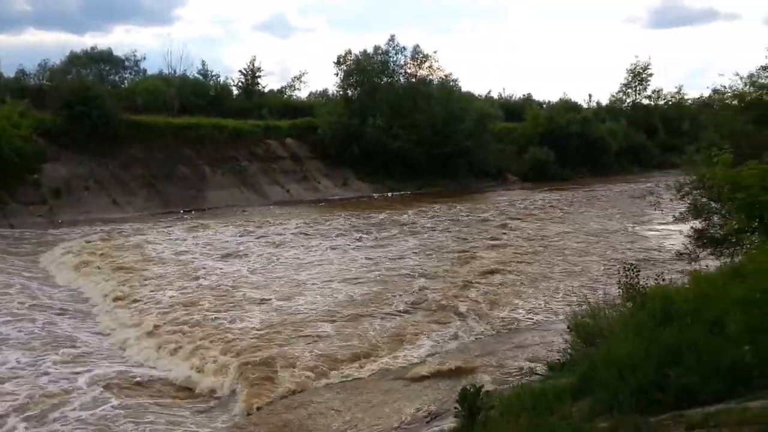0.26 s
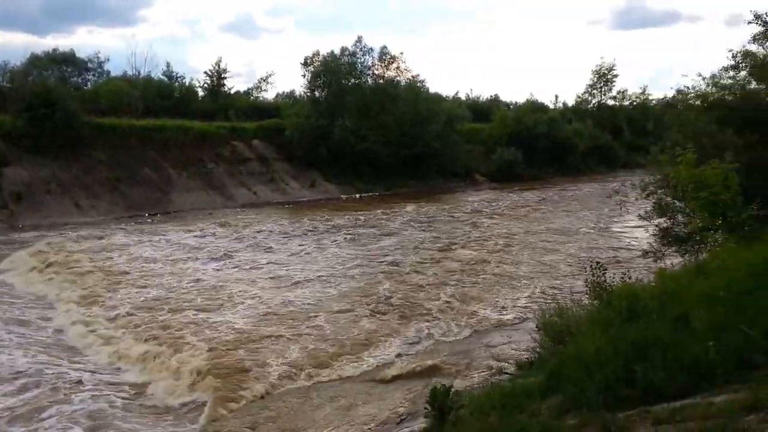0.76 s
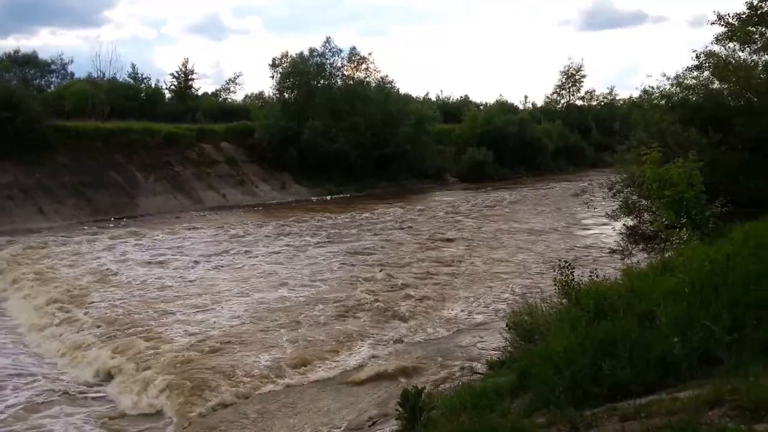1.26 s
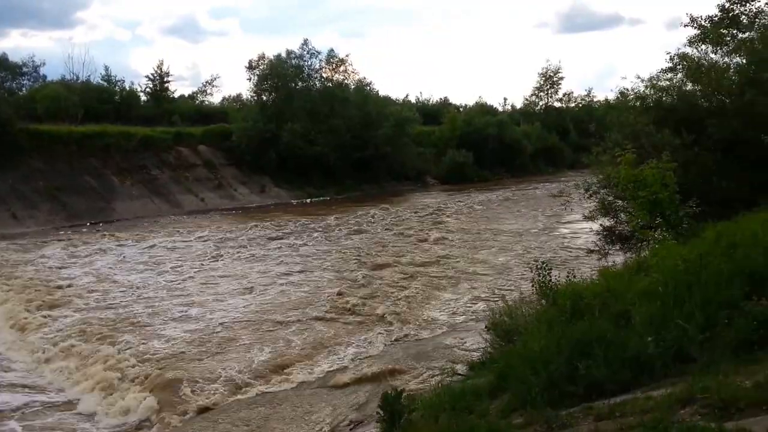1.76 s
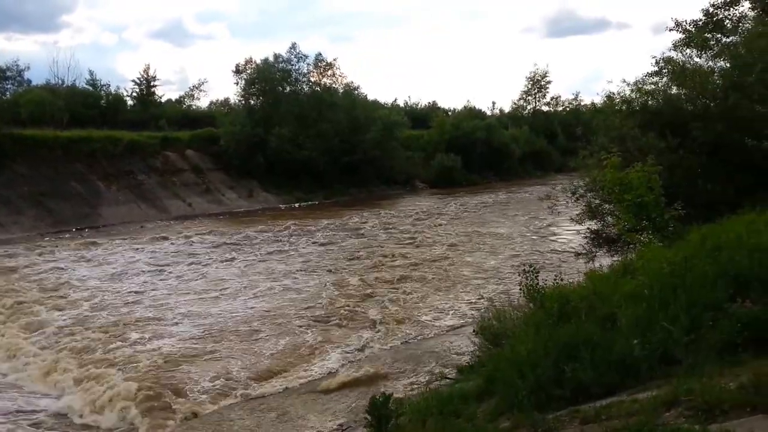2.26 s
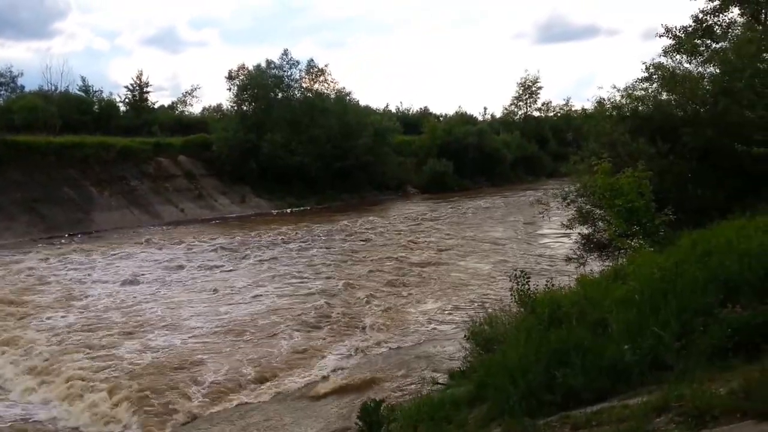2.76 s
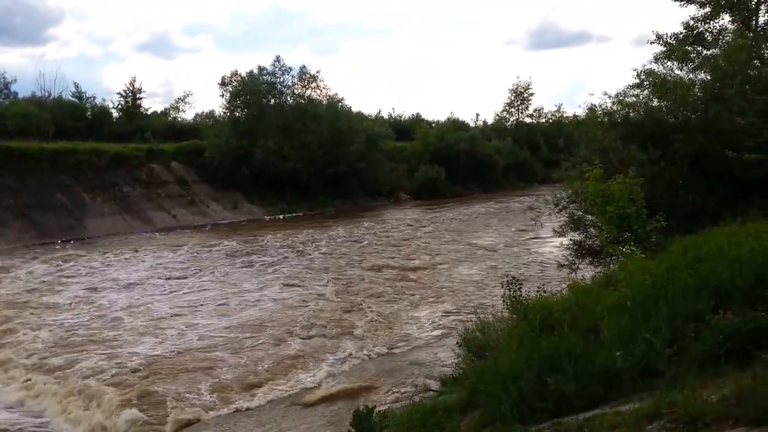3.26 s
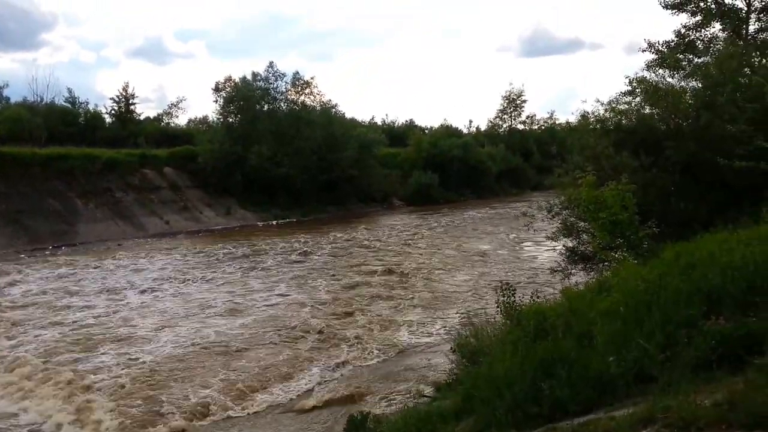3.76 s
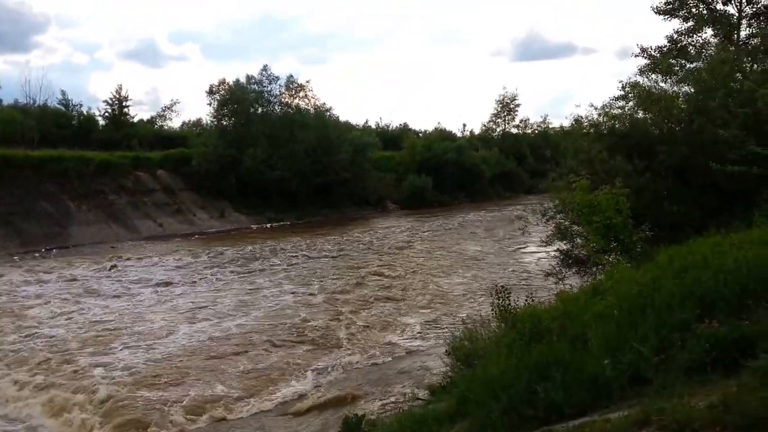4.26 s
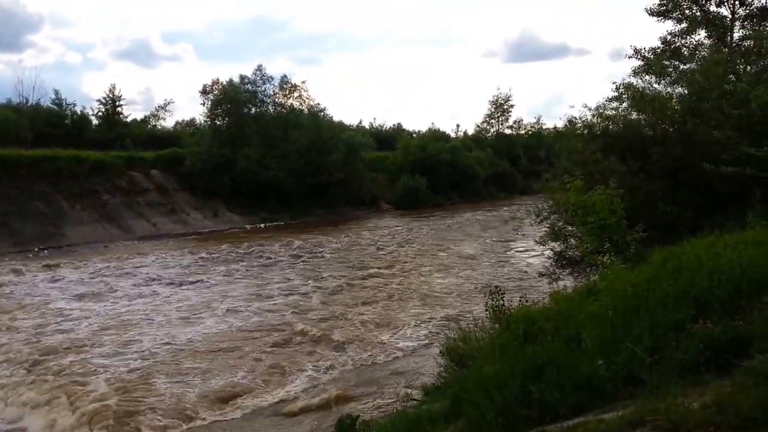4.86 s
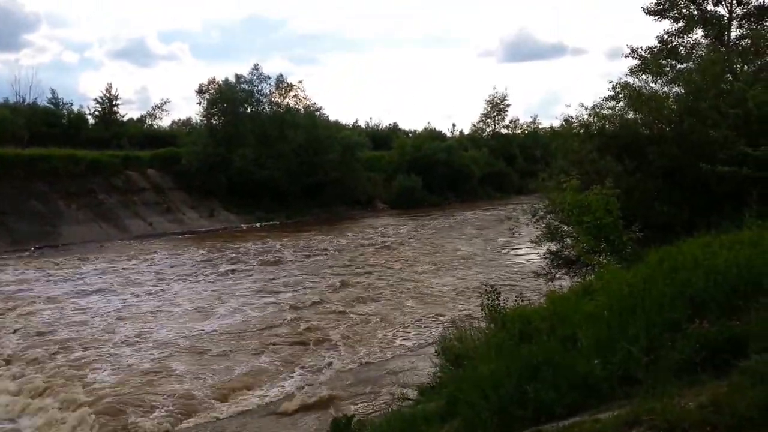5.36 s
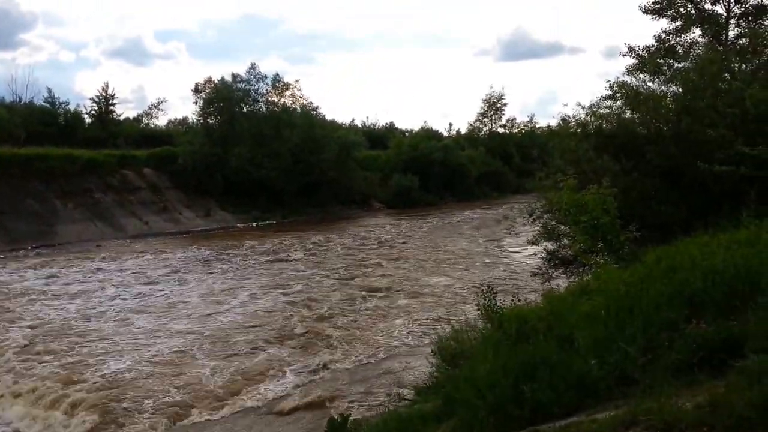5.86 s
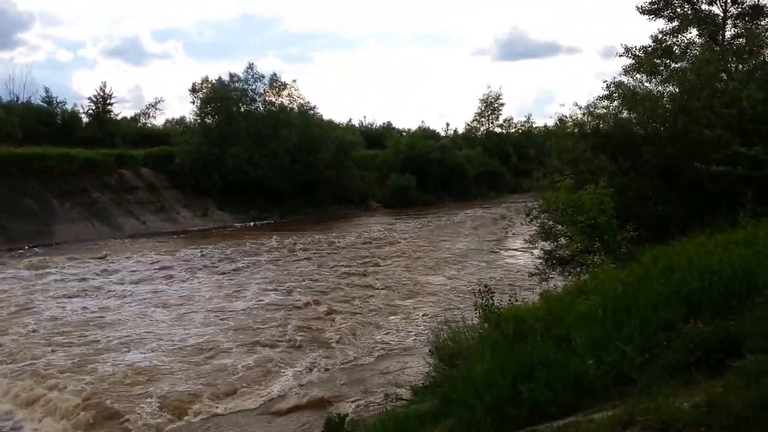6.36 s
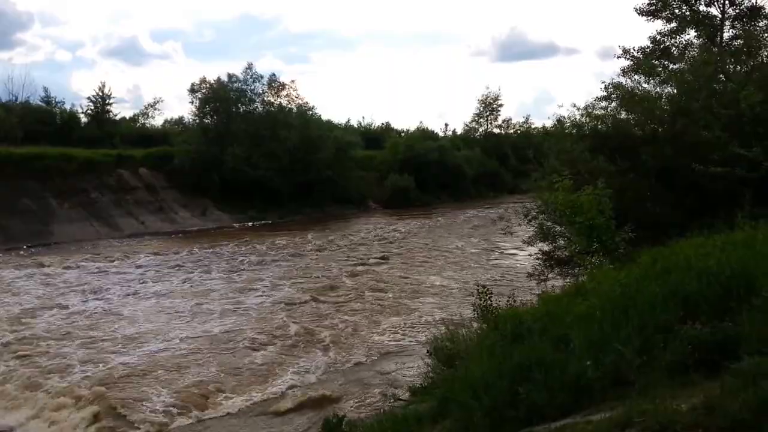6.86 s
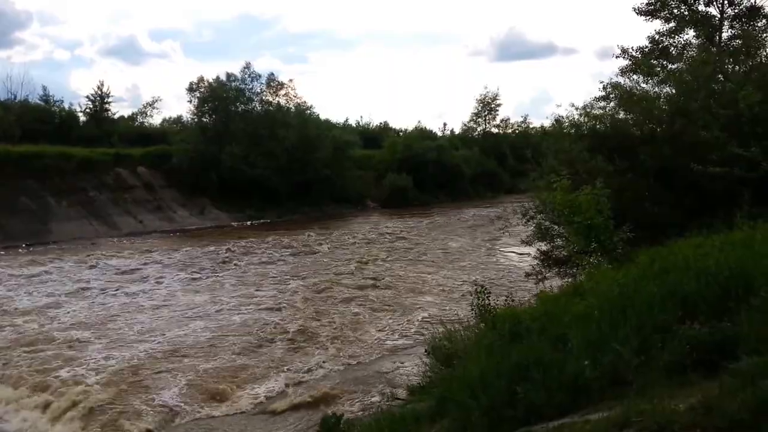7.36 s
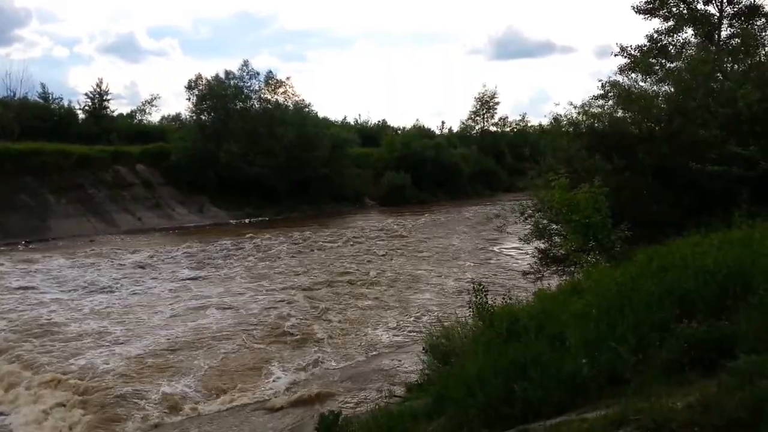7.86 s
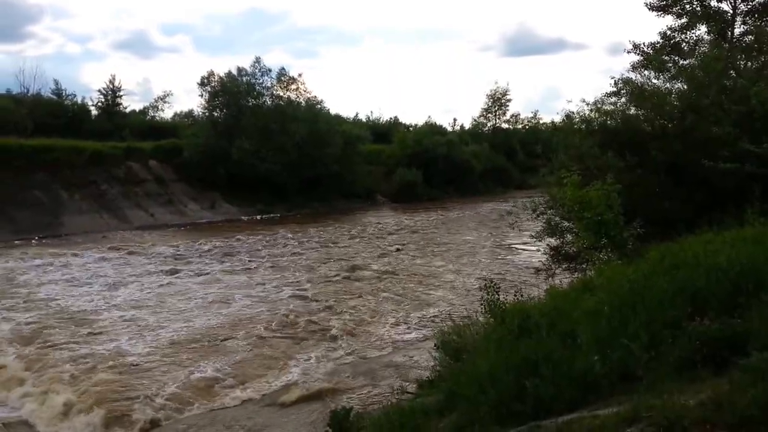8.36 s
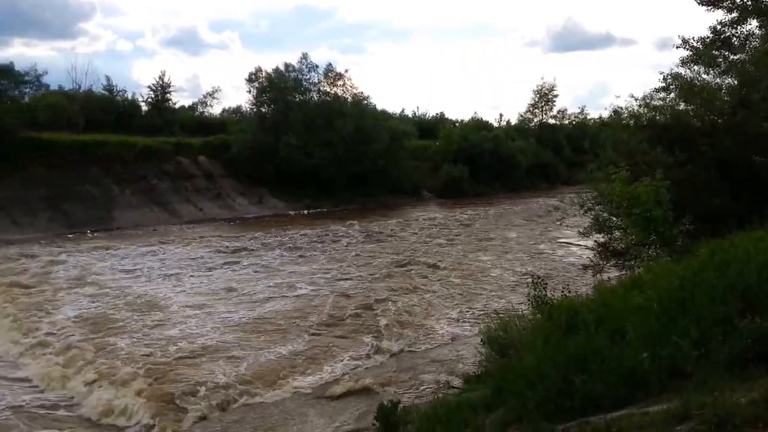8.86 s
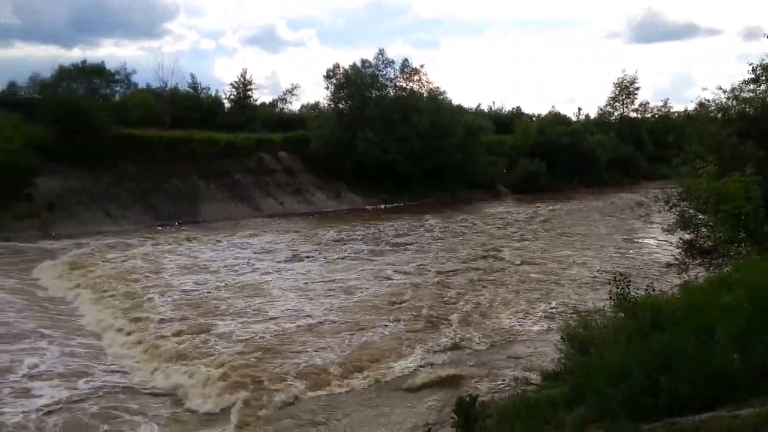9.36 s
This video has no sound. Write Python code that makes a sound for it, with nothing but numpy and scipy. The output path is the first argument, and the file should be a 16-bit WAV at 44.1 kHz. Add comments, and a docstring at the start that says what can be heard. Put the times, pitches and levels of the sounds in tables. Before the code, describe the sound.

Heard outdoors from the bank, a swollen river rushes continuously over a weir. A broad hiss of foam lies on top of a bubbling, hollow roar and a soft rumble with gulping pockets of air. These sounds swell gently together as crests collapse several times a second, but the overall level holds throughout, spread widely across a stereo microphone.

```python
"""Rushing foam of muddy floodwater pouring over a low weir, heard in the open from the bank.
Breaking crests hiss and countless small bubbles fizz. Below the sill a roller folds in air:
mid-size bubbles ring as splashes, large pockets gulp. All surge as waves topple a few times
a second. The sound reaches two small microphone ports; left and right differ in colour."""
import sys
import numpy as np
from scipy import signal
from scipy.fft import rfft, irfft, next_fast_len
from scipy.io import wavfile
from scipy.ndimage import uniform_filter1d

SR = 44100
rng = np.random.default_rng(int(sys.argv[2]) if len(sys.argv) > 2 else 0)


def dump(signal):
    """Clip the signal to [-1, 1] and save it as 16-bit WAV at the path in sys.argv[1]."""
    limited = np.clip(np.atleast_2d(signal).T, -1, 1)
    pcm = np.round(limited * 32767).astype(np.int16)
    wavfile.write(sys.argv[1], SR, pcm)


N = 423338
FFT_SIZE = next_fast_len(N)
BIN_HZ = np.maximum(np.arange(FFT_SIZE // 2 + 1) * SR / FFT_SIZE, 1)
TIME_S = np.arange(N) / SR

FOAM_DB, SPLASH_DB, GULP_DB = -20.5, -26.5, -28.5  # between waves, ahead of the ports
TOPPLE_S, SPILL_POWER = 0.058, 5.1  # higher power holds a wave longer
ROLL_S = 0.024  # wave travel along the roller's width
FLICKER_S, POCKET_S = 0.022, 0.025
RIGHT_LEAD_S, CUTOFF_HZ = 0.000319, 14000

# Foam spectrum: freq_hz, level_db
FOAM_SPECTRUM = [(100, -55), (450, -16), (850, -2.26), (1250, 0.47), (1800, 0), (2600, -4.5), (3200, -7.5),
                 (4600, -8), (6100, -19.5), (9700, -20.5), (12000, -25.5), (13000, -35.5), (14000, -53)]
# Splash spectrum: freq_hz, level_db
SPLASH_SPECTRUM = [(200, -42), (400, -8), (560, -1.3), (700, -1), (800, -6), (950, -11.5), (1300, -18.5),
                   (6000, -76)]
# Gulp spectrum: freq_hz, level_db
GULP_SPECTRUM = [(20, -35), (48, -33), (62, -29), (75, -24), (158, -5.0), (290, 0.2), (400, -6.5),
                 (600, -16), (2000, -62)]
# Toppling waves: start_s, length_s, foam_rise_db, splash_rise_db, gulp_rise_db
WAVES = [(-0.03, 0.19, 2.7, 3.5, 3.0), (0.12, 0.44, 2.4, 3.0, 2.4), (0.51, 0.21, 2.5, 4.0, 2.6),
         (0.73, 0.35, 2.3, 3.1, 2.6), (1.01, 0.26, 2.3, 3.2, 3.6), (1.22, 0.4, 2.7, 3.5, 3.5),
         (1.55, 0.17, 2.3, 3.1, 2.9), (1.73, 0.3, 2.1, 2.3, 4.0), (1.98, 0.27, 2.1, 3.0, 1.7),
         (2.21, 0.29, 2.6, 4.1, 3.5), (2.42, 0.23, 2.9, 3.3, 3.0), (2.61, 0.2, 2.5, 2.6, 1.2),
         (2.79, 0.23, 2.7, 3.5, 2.0), (3.1, 0.28, 1.9, 2.9, 2.9), (3.34, 0.15, 3.2, 3.5, 4.7),
         (3.55, 0.21, 2.4, 3.1, 2.5), (3.7, 0.31, 2.7, 3.0, 3.6), (4.01, 0.35, 2.4, 3.0, 3.1),
         (4.36, 0.17, 3.1, 3.7, 4.6), (4.51, 0.22, 2.6, 2.9, 3.8), (4.73, 0.24, 3.0, 4.2, 3.8),
         (4.91, 0.33, 2.1, 2.9, 3.6), (5.18, 0.15, 2.5, 1.6, 3.3), (5.35, 0.17, 2.7, 3.0, 1.2),
         (5.52, 0.35, 2.4, 2.7, 2.1), (5.82, 0.3, 2.4, 3.4, 3.3), (6.1, 0.45, 2.6, 2.9, 3.2),
         (6.52, 0.26, 2.3, 2.9, 3.3), (6.7, 0.18, 2.6, 2.6, 3.2), (6.84, 0.39, 2.5, 2.9, 4.2),
         (7.16, 0.23, 3.0, 3.7, 2.2), (7.34, 0.46, 3.0, 3.9, 3.2), (7.75, 0.19, 2.5, 2.8, 2.7),
         (7.92, 0.19, 2.7, 3.5, 4.1), (8.13, 0.36, 2.1, 2.9, 3.8), (8.45, 0.24, 2.6, 3.2, 2.3),
         (8.72, 0.15, 0.9, 2.0, 1.2), (8.82, 0.23, 2.8, 3.3, 3.6), (8.97, 0.18, 2.3, 2.7, 2.8),
         (9.07, 0.37, 2.1, 2.8, 2.4), (9.43, 0.39, 2.8, 2.6, 3.6)]
# Slow rise and slack of the flow over the sill: time_s, level_db
FLOW = [(0, 0.4), (0.6, 0), (2.9, -0.1), (3.07, -0.7), (3.25, -0.07), (6.8, 0), (7.4, -0.1), (8.7, 0),
        (9.6, 0.1)]
# Brief lifts and dips in splash and foam loudness: time_s, splash_db, foam_db
SPLASH_FOAM_FLICKERS = [(0.1, 2.5, 1), (0.59, 1, 1.3), (1.36, 3, 0), (1.62, -1, 2), (2.02, 2, -0.5),
                        (2.28, 4.5, 0.4), (3.39, 2, 0.6), (3.85, 2, 2), (4.15, 0, -1), (4.44, 3, 0.6),
                        (4.59, 1.2, 1.5), (4.82, 1.5, 0.7), (5.12, 4, 1), (5.41, 1.2, 0.3), (5.96, 2, 0.7),
                        (6.2, 3, 1.2), (6.43, -1.5, 2), (6.75, 0, 0.7), (7.0, 2, -0.2), (7.22, 2, -0.5),
                        (7.51, 0.8, 1.0), (9.02, 1.5, 0.1), (9.1, -2, 0.5)]
# Big air pockets swallowed by the roller: time_s, gulp_rise_db
POCKETS = [(1.08, 3), (1.82, 1.2), (2.31, 3), (2.55, 3), (3.2, 3), (3.43, 1.5), (3.77, 2), (4.12, 1),
           (4.44, 0), (4.8, 1.8), (6.93, 2), (8.35, 2.5), (8.89, 3)]
# Left-over-right level, left treble cut above 12 kHz: freq_hz, balance_db
CHANNEL_BALANCE = [(100, -2), (250, -1), (370, 0), (560, -3.5), (800, 2), (1100, 3), (1280, 2.5),
                   (2000, 8.5), (3300, -1.5), (4400, -1.7), (6400, -5), (9800, -1.3), (12000, -3.5),
                   (13200, -19)]
# Sound shared by the ports: freq_hz, coherence_ratio
PORT_COHERENCE = [(40, .15), (90, 0.97), (150, 0.99), (300, 0.99), (400, 0.87), (550, 0.94), (730, 0.88),
                  (1050, 0.72), (1650, 0.54), (2050, 0.46), (2550, 0.7), (3300, 0.1), (5500, 0.06),
                  (7500, 0.2), (13000, 0.04)]
# Right port phase on top of its lead: freq_hz, phase_rad
PORT_PHASE = [(100, -0.64), (400, -0.34), (700, -0.91), (1250, -0.86), (1800, 0.012), (2350, 0.83),
              (3300, 1.98), (6300, -1.23), (10000, 0.17)]


def foam(surge_db):
    """Breaking crests hiss; the nearest small bubbles and droplets fizz on top."""
    fizz = bubbles(low_hz=812, high_hz=11560, per_s=12000, cycles=7.7, spread_db=2, clump_db=1, sizes=14)
    hiss = crest_hiss(depth_db=0.5, rate_hz=22, bands=6)
    water = coloured(hiss + from_db(-8.5) * fizz, FOAM_SPECTRUM)
    return water * swell(depth_db=0.44, rate_hz=29) * from_db(FOAM_DB + surge_db)


def crest_hiss(depth_db, rate_hz, bands):
    """Crests break here and there: white noise, each band swelling on its own; rms 1."""
    white = rfft(rng.standard_normal((2, FFT_SIZE)))
    band_position = np.interp(np.log(BIN_HZ), np.log([700, 11000]), [0, bands - 1])
    hiss = np.zeros((2, N))
    for band in range(bands):
        weight = np.maximum(1 - np.abs(band_position - band), 0)
        hiss += irfft(white * weight, FFT_SIZE)[:, :N] * swell(depth_db, rate_hz)
    return rms_one(hiss)


def splashes(surge_db):
    """Toppling crests drag mid-size bubbles under, which ring together as a hollow roar."""
    near = bubbles(low_hz=430, high_hz=1095, per_s=1800, cycles=28, spread_db=2, clump_db=1, sizes=12)
    roar = coloured(rng.standard_normal((2, N)), SPLASH_SPECTRUM)
    water = levelled(roar + from_db(-3.5) * coloured(near, SPLASH_SPECTRUM), window_s=0.24)
    return water * swell(depth_db=0.66, rate_hz=11.4) * from_db(SPLASH_DB + surge_db)


def gulps(surge_db):
    """Large near air pockets gulp over the rumble of the whole roller."""
    near = bubbles(low_hz=129, high_hz=424, per_s=900, cycles=19, spread_db=2, clump_db=0.5, sizes=10)
    rumble = coloured(rng.standard_normal((2, N)), GULP_SPECTRUM)
    water = levelled(rumble + from_db(-5) * coloured(near, GULP_SPECTRUM), window_s=0.13)
    return water * swell(depth_db=0.47, rate_hz=23) * from_db(GULP_DB + surge_db)


def bubbles(low_hz, high_hz, per_s, cycles, spread_db, clump_db, sizes):
    """Two independent swarms, born at random, each bubble ringing down 60 dB in `cycles`; rms 1."""
    chance = rng.random((2, N))
    size_index = rng.integers(0, sizes, (2, N), dtype=np.int8)
    strength = from_db(spread_db * np.minimum(rng.exponential(1, (2, N)), 4))
    polarity = rng.choice([-1, 1], (2, N))
    births = strength * polarity * (chance < per_s / SR)
    swarms = np.zeros((2, N))
    for size, pitch_hz in enumerate(np.geomspace(low_hz, min(high_hz, CUTOFF_HZ), sizes)):
        radius = from_db(-60 * pitch_hz / (cycles * SR))
        step_rad = 2 * np.pi * pitch_hz / SR
        feedback = [1, -2 * radius * np.cos(step_rad), radius * radius]
        rings = signal.lfilter([1 - radius, 0, radius - 1], feedback, births * (size_index == size))
        swarms += rings * swell(clump_db, rate_hz=7.4)  # each size comes in clouds
    return rms_one(swarms)


def wave_surges_db():
    """Waves topple, spill and collapse on the slow flow; one curve each for foam, splashes, gulps."""
    waves_db = np.zeros((3, N))
    for start_s, length_s, *rises_db in WAVES:
        during = (TIME_S >= start_s) & (TIME_S < start_s + length_s)
        age_s = TIME_S[during] - start_s
        topple = np.sin(np.pi / 2 * np.minimum(age_s / TOPPLE_S, 1))
        spill = 1 - (age_s / length_s) ** SPILL_POWER
        waves_db[:, during] += np.outer(rises_db, topple * spill)
    flow_db = np.interp(TIME_S, *np.transpose(FLOW))
    return uniform_filter1d(waves_db, int(ROLL_S * SR)) + flow_db


def bursts_db(events, width_s):
    """Brief bell-shaped lifts or dips; one curve per level column."""
    return sum(np.outer(rises_db, 1 / (1 + ((TIME_S - peak_s) / width_s) ** 2) ** 2)
               for peak_s, *rises_db in events)


def swell(depth_db, rate_hz):
    """Randomly wandering gain: depth_db rms, low-passed at rate_hz."""
    hop, warmup = 100, 500
    pole = np.exp(-2 * np.pi * hop * rate_hz / SR)
    noise = rng.standard_normal(N // hop + warmup + 2)
    drift = signal.lfilter([1], [1, -2 * pole, pole * pole], noise)[warmup:]
    return np.interp(np.arange(N) / hop, np.arange(len(drift)), from_db(depth_db * rms_one(drift)))


def levelled(sound, window_s):
    """Many bubbles at once sum to an even level over window_s; rms 1."""
    window = int(window_s * SR)
    power = uniform_filter1d(uniform_filter1d(sound ** 2, window), window)
    return rms_one(sound / np.sqrt(power + 1e-9))


def ports(water):
    """The wide river reaches both ports alike in the bass, mostly unalike in the treble."""
    shared, apart = rfft(water, FFT_SIZE)
    coherence = at_hz(PORT_COHERENCE)
    mid = np.sqrt((1 + coherence) / 2) * shared
    side = np.sqrt((1 - coherence) / 2) * apart
    lean = from_db(at_hz(CHANNEL_BALANCE) / 2)
    lead_rad = 2 * np.pi * BIN_HZ * RIGHT_LEAD_S + at_hz(PORT_PHASE)
    left = (mid + side) * lean
    right = (mid - side) * np.exp(1j * lead_rad) / lean
    return irfft(np.array([left, right]), FFT_SIZE)[:, :N]


def coloured(sound, spectrum):
    """Apply a spectrum table; rms 1."""
    shaped = rfft(sound, FFT_SIZE) * from_db(at_hz(spectrum))
    return rms_one(irfft(shaped, FFT_SIZE)[..., :N])


def at_hz(table):
    """Table value at each FFT bin, on a log-frequency axis."""
    freq_hz, values = np.transpose(table)
    return np.interp(np.log(BIN_HZ), np.log(freq_hz), values)


def from_db(level_db):
    """Decibels to gain."""
    return 10 ** (np.asarray(level_db) / 20)


def rms_one(sound):
    """Scale to rms 1."""
    return sound / np.sqrt(np.mean(sound ** 2) + 1e-20)


def scene():
    """The weir at the two ports; the same waves drive all three layers."""
    foam_db, splash_db, gulp_db = wave_surges_db()
    splash_flicker_db, foam_flicker_db = bursts_db(SPLASH_FOAM_FLICKERS, FLICKER_S)
    pocket_db, = bursts_db(POCKETS, POCKET_S)
    water = foam(foam_db + foam_flicker_db)
    water += splashes(splash_db + splash_flicker_db)
    water += gulps(gulp_db + pocket_db)
    return ports(water)


def record(dry):
    """Steep low-pass at CUTOFF_HZ."""
    return signal.sosfilt(signal.ellip(10, 0.1, 90, CUTOFF_HZ, fs=SR, output="sos"), dry)


dry = scene()
out = record(dry)
dump(out)
```